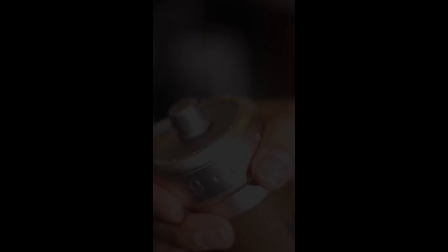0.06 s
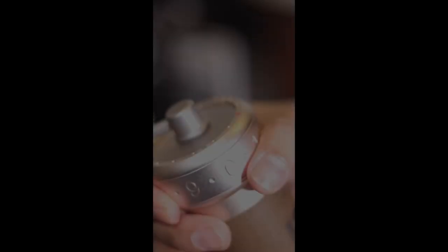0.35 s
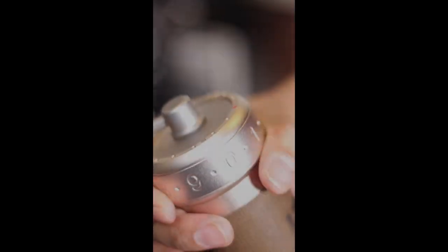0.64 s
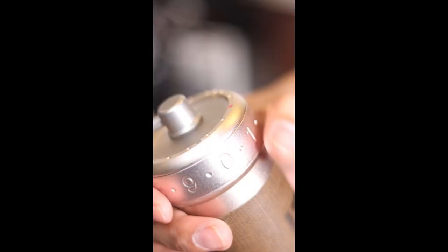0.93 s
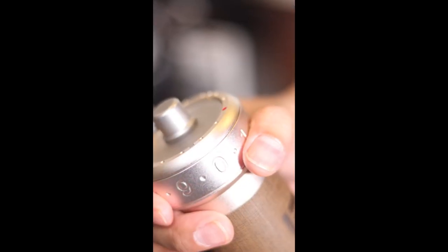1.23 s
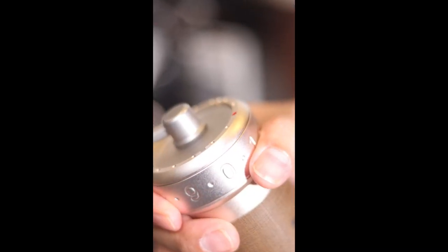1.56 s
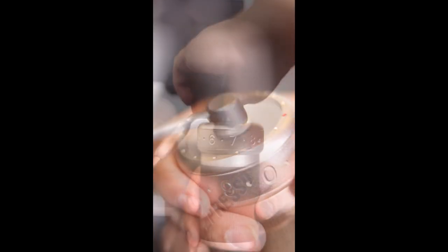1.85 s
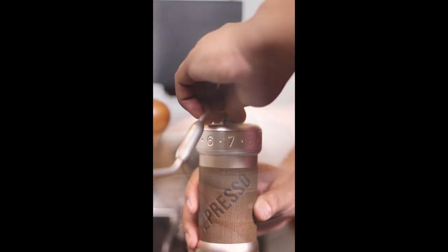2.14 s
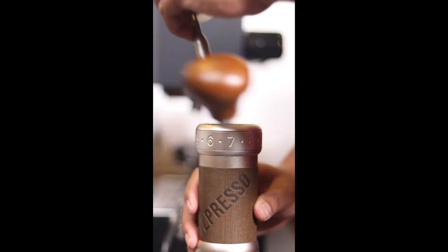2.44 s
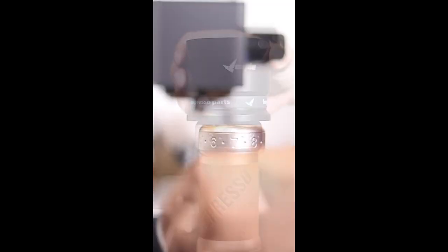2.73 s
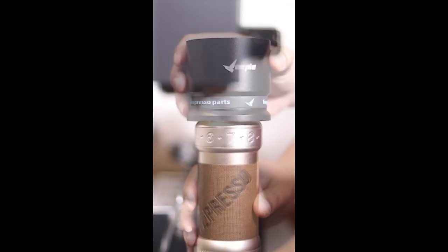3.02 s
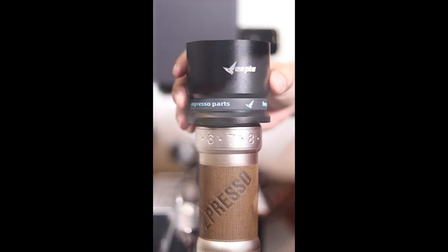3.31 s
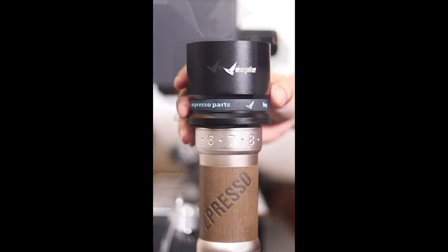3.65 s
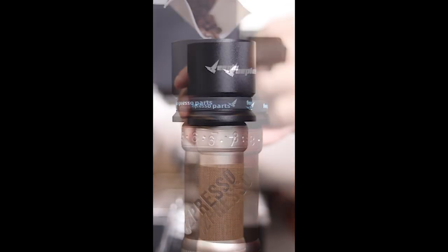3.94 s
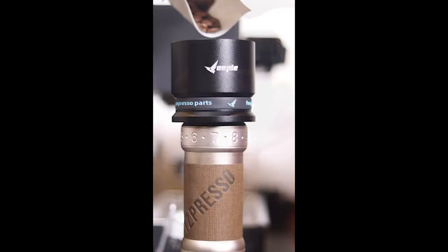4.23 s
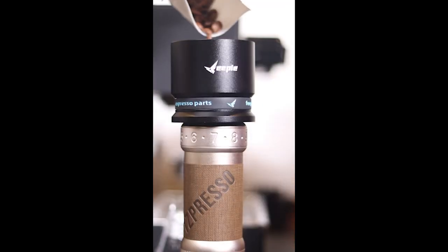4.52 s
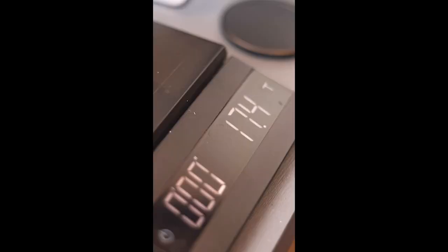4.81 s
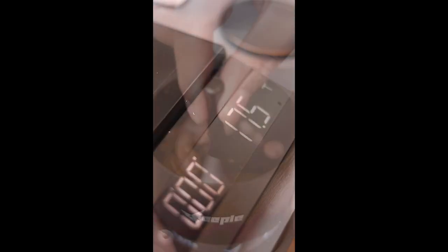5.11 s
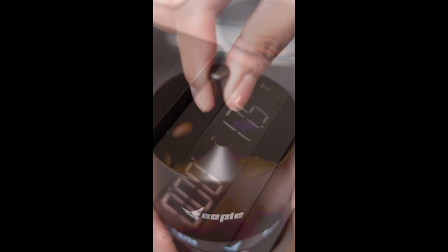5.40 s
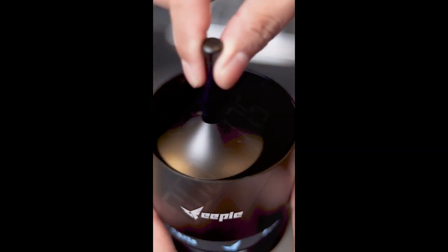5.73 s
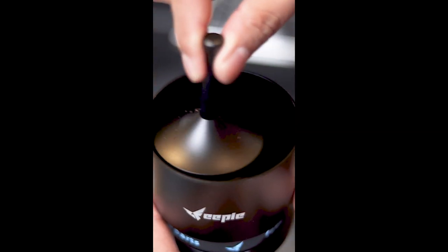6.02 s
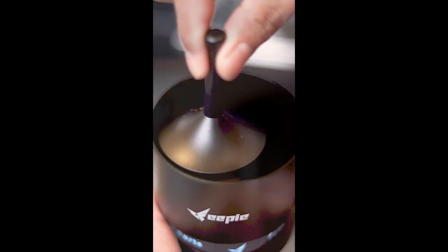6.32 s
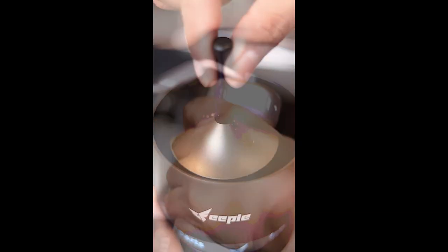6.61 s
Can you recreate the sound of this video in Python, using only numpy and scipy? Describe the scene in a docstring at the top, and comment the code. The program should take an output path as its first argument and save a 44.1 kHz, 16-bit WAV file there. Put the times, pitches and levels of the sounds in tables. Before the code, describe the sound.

A hand coffee grinder's dial gives a few sharp clicks. Its steel crank scrapes off briefly and a funnel knocks into place. Coffee beans trickle in, ticking and rattling, then rush more loudly into a metal cup. A plunger strikes the cup three times with loud, ringing clinks, and beans begin to crunch at the end. Everything is close in a small kitchen, with faint traffic outside.

```python
"""Making coffee with a metal hand grinder, close up in a small kitchen, with faint traffic outside.
First the grind dial clicks into its notches. The crank scrapes off (2.3 s), a funnel is knocked into
place (3.1 s) and beans pour in, ticking and rattling (3.6 s). More beans rush into a metal dosing cup
(4.9 s), which rings as its plunger strikes it. Last, the grinding burrs start to crunch beans (6.2 s)."""
import sys
import numpy as np
from scipy import signal
from scipy.fft import rfft, irfft
from scipy.io import wavfile

SR = 44100
rng = np.random.default_rng(int(sys.argv[2]) if len(sys.argv) > 2 else 0)


def put_to_file(sound):
    """Save the sound as 16-bit audio at rate SR, in the file named by the first command-line argument."""
    columns = np.atleast_2d(sound).T  # one column per channel
    safe = np.clip(columns, -1, 1)
    whole_steps = np.round(safe * 32767)
    wavfile.write(sys.argv[1], SR, whole_steps.astype(np.int16))


N = 302437
TIME = np.arange(N) / SR
RING_TIME, GRAIN_TIME = TIME[:SR // 2], TIME[:SR // 40]


def undb(db):
    """Turn decibels into a number to multiply by."""
    return 10 ** (np.asarray(db) / 20)


def unit(x):
    """Scale to an average power of 1."""
    return x / np.sqrt(np.mean(x ** 2))


def fade(t, t60):
    """Die away by 60 dB every t60 seconds."""
    return np.exp(-np.log(1000) * t / np.maximum(t60, 1e-4))


def note(hz, t60, t=RING_TIME):
    """One way an object can vibrate: a pure tone that dies away."""
    return np.sin(2 * np.pi * hz * t) * fade(t, t60)


def add(out, start_s, x):
    """Mix x into out from start_s on."""
    i = max(int(start_s * SR), 0)
    out[i:i + len(x)] += x[:max(N - i, 0)]


def colour(x, points, tilt_db=0, centre_hz=None, size=4096):
    """Shape the tone along (freq_hz, gain_db) points, with an optional tilt per octave or broad hump."""
    hz = np.maximum(np.arange(size // 2 + 1) * SR / size, 1)
    freqs, db = np.transpose(points)
    curve_db = np.interp(np.log(hz), np.log(freqs), db)
    shape = undb(curve_db + tilt_db * np.log2(np.maximum(hz, freqs[0])))
    shape = shape * np.minimum(hz / freqs[0], 1) * np.minimum(freqs[-1] / hz, 1) ** 2
    if centre_hz:
        shape = shape / np.hypot(1, (hz / centre_hz) ** 2) * np.sqrt(hz / (hz + centre_hz))
    # build the filter so that nothing sounds ahead of a hit
    cepstrum = irfft(np.log(unit(shape)))
    cepstrum[1:size // 2] *= 2
    cepstrum[size // 2 + 1:] = 0
    return signal.fftconvolve(x, irfft(np.exp(rfft(cepstrum))))[:len(x)]


def burst(t60):
    """Many vibrations dying at once: fading noise with a total energy of 1."""
    x = rng.standard_normal(len(RING_TIME)) * fade(RING_TIME, t60)
    return x / np.linalg.norm(x)


def snap(t60, hz, strength):
    """A dry crack with a hint of pitch, no higher than SR / 3."""
    crack = burst(t60)
    pitched = signal.lfilter(*signal.iirpeak(min(hz, SR / 3), 7, fs=SR), crack)
    x = crack + strength * pitched
    return x / np.linalg.norm(x)


def wander(rate_hz):
    """A smooth random drift, mostly between -1 and 1."""
    points = rng.standard_normal(1000)
    return np.interp(TIME * rate_hz, np.arange(len(points)), points)


def flow(start_s, build_s, stop_s, t60):
    """How strongly beans flow, 0 to 1: it builds up evenly, holds, then dies away."""
    return np.clip((TIME - start_s) / build_s, 0, 1) * fade(np.maximum(TIME - stop_s, 0), t60)


def grains(count, t60, crack, notes=6):
    """Tiny hits of equal energy: each bean has a few high notes of its own and a rough crack."""
    draw = rng.random((count, notes, 3))
    hz, phase = 2500 + 13000 * draw[..., :1], draw[..., 1:2]
    ring = np.sin(2 * np.pi * (hz * GRAIN_TIME + phase)).sum(axis=1) / np.sqrt(notes / 2)
    decay = fade(GRAIN_TIME, t60 * (.5 + draw[:, 0, 2:]))
    x = (ring + crack * rng.standard_normal(ring.shape)) * decay
    return x / np.linalg.norm(x, axis=1, keepdims=True)


def shower(stream, count, spread_db, t60, crack, thinning=0):
    """Random hits of uneven force; with thinning, fewer land where the flow is weak."""
    start, _, stop, dying_s = stream
    end = stop + dying_s / 2
    draw, out = rng.random((count, 3)), np.zeros(N)
    force = unit(undb(spread_db * np.minimum(-np.log(draw[:, 1]), 3)))
    times = start + (end - start) * (np.arange(count) + 4 * draw[:, 0] - 2) / count
    lands = draw[:, 2] < np.interp(times, TIME, flow(*stream)) ** thinning
    for start_s, strength, grain in zip(times, force * lands, grains(count, t60, crack)):
        add(out, start_s, strength * grain)
    return out * np.sqrt((end - start) * SR / count)


def kitchen(x, t60):
    """Echoes from nearby walls, duller than the direct sound."""
    echoes = burst(t60) * (1 - fade(RING_TIME, 0.0091))
    tail = colour(echoes, [(150, 0), (3500, -10), (5500, -10.5), (8000, -13.5), (15000, -19.0)])
    return signal.fftconvolve(x, tail)[:N]


def drone(start_s, length_s, first_hz, last_hz, db, waver_db):
    """A low, unsteady tone that swells and fades while its pitch slides."""
    along = np.clip((TIME - start_s) / length_s, 0, 1)
    pitch = (first_hz + (last_hz - first_hz) * along) * (1 + 0.0171 * wander(18))
    level = np.sin(np.pi * along) * undb(db + waver_db * wander(23))
    return level * np.sin(2 * np.pi * np.cumsum(pitch) / SR)


# how loud the background is over time: time_s, rumble_db, hiss_db
ROOM_LEVELS = [(0, -79.5, -87.5), (.2, -64.5, -71.5), (.8, -55.5, -69.5), (1.95, -53.5, -63.5),
               (2.25, -64, -68.5), (2.65, -63, -66), (3.5, -67.5, -69.5), (4.9, -58.5, -63),
               (6.86, -55.5, -59)]
# tone of the rumble and of the hiss: freq_hz, gain_db
RUMBLE_TONE = [(15, -32), (25, -6), (59, 0), (87, -1.5), (204, -1), (275, -12), (306, -8.5), (425, -20.5),
               (472, -14), (525, -21.5), (619, -21), (900, -31), (1170, -81), (1980, -120)]
HISS_TONE = [(300, 10.5), (700, 7), (1300, 0.5), (2200, -4), (3500, 0), (4600, -5.5), (6000, -14),
             (10000, -17.5), (16000, -19.5)]
# faint hums, like far engines: start_s, length_s, first_hz, last_hz, level_db
FAR_HUMS = [(0, 2.17, 197, 203.7, -56), (3.8, 1.27, 120.3, 99.1, -51.5), (3.92, 0.55, 162.2, 143.3, -57),
            (5.498, 1.03, 194.4, 196.2, -58.5), (5.697, 1.34, 165.7, 160, -58)]
def traffic():
    """Traffic rumbles through the walls under a soft hiss."""
    times, rumble_db, hiss_db = np.transpose(ROOM_LEVELS)
    rumble_level = undb(np.interp(TIME, times, rumble_db) + 1.7 * wander(9))
    rumble = rumble_level * colour(rng.standard_normal(N), RUMBLE_TONE)
    hiss = undb(np.interp(TIME, times, hiss_db)) * colour(rng.standard_normal(N), HISS_TONE)
    return rumble + hiss + sum(drone(*row, waver_db=3.0) for row in FAR_HUMS)


# tone of the crunch: freq_hz, gain_db
CRUNCH_TONE = [(150, -6.5), (550, -5), (1100, 2), (1550, 4), (2100, -0.5), (3200, 7), (4300, -1),
               (6200, -9), (7500, 1), (8500, -10), (10500, -14.5), (10950, -7.5), (11500, -9.5),
               (16000, -23)]
def burrs():
    """Beans crack in quick succession between the burrs, heard through the grinder's walls."""
    stream = (6.2, 0.58, 6.86, .1)  # start_s, build_s, stop_s, t60_s
    cracks = shower(stream, count=420, spread_db=3.5, t60=0.046, crack=3.3)
    return undb(-38.5) * flow(*stream) * colour(cracks, CRUNCH_TONE)


# scrapes of the crank: start_s, level_db, tilt_db_per_octave, t60_s
SCRAPES = [(2.251, -37.5, -2, 0.095), (2.286, -23, -4, 0.11), (2.2955, -21.5, 0, 0.069),
           (2.3015, -16.5, 2, 0.017), (2.445, -27.5, -3, 0.08), (2.451, -37, -5.5, 0.044)]
# their tone: freq_hz, gain_db
SCRAPE_TONE = [(300, -7.5), (550, -20), (900, -7), (1700, -4.5), (2300, 2.5), (3300, 6.5), (4200, -6.5),
               (5200, -12.5), (7500, -14), (12000, -26), (16000, -29)]
def crank():
    """The steel crank scrapes off its shaft."""
    out = np.zeros(N)
    for start_s, db, tilt_db, t60 in SCRAPES:
        add(out, start_s, undb(db) * colour(burst(t60), SCRAPE_TONE, tilt_db))
    return out


# knocks of the funnel: start_s, level_db, pitch_hz, t60_s
FUNNEL_KNOCKS = [(3.1008, -7.5, 960, 0.0058), (3.106, -16.5, 3040, 0.057), (3.1183, -16.5, 1510, 0.016),
                 (3.125, -22, 600, 0.052), (3.135, -27, 3000, 0.021)]
# their tone: freq_hz, gain_db
KNOCK_TONE = [(100, -9), (300, 1), (560, 7), (1000, 9.5), (1700, 5.5), (2300, -1), (3100, 8), (4500, -4.5),
              (8000, -17), (15000, -14)]
def funnel():
    """The funnel lands on the grinder and settles with a few softer knocks."""
    out = np.zeros(N)
    for start_s, db, hz, t60 in FUNNEL_KNOCKS:
        add(out, start_s, undb(db) * colour(burst(t60), KNOCK_TONE, centre_hz=hz))
    return out


# hollow notes of the grinder: start_s, pitch_hz, level_db, t60_s
BODY_NOTES = [(2.255, 607, -52, 0.28), (2.285, 530, -40.5, 0.041), (3.101, 169, -50.5, 0.29),
              (3.102, 277.4, -51.5, 0.4), (3.1, 553, -48, 0.15)]
def grinder_body():
    """The hollow body rings briefly when the crank or funnel bumps it."""
    out = np.zeros(N)
    for start_s, hz, db, t60 in BODY_NOTES:
        add(out, start_s, undb(db) * note(hz, t60))
    return out


# clicks of the dial: start_s, relative_level_db, pitch_hz, pitch_strength, echo_db
DIAL_CLICKS = [(0.128, -20, 14200, 0.37, -10.5), (0.3369, -13, 2920, 1, -11), (.709, -43, 6100, 1.7, -4),
               (1.106, -46, 2200, 3.2, -3), (1.6256, -11.5, 10100, 2.6, -19), (1.6262, -14, 5130, 4.4, -15)]
# their tone: freq_hz, gain_db
CLICK_TONE = [(300, -19.5), (1200, -8), (2000, -4.5), (2800, 1.5), (3800, -1.5), (5300, 2), (7000, -4.5),
              (8700, -7), (10500, 1.5), (12200, -7.5), (14000, 1.5), (16000, -5.5)]
def dial():
    """A catch snaps into its notch and the thick steel rings for a few milliseconds."""
    direct, to_walls = np.zeros(N), np.zeros(N)
    for start_s, db, hz, strength, echo_db in DIAL_CLICKS:
        click = undb(db + 1.5) * colour(snap(t60=0.016, hz=hz, strength=strength), CLICK_TONE)
        add(direct, start_s, click)
        add(to_walls, start_s, click * undb(echo_db))
    return direct + kitchen(to_walls, t60=0.18)


# the hardest landings: start_s, relative_level_db, pitch_hz
LANDINGS = [(3.717, -39.5, 12000), (3.751, -35, 13800), (3.789, -39.5, 4900), (3.8494, -33, 7800),
            (3.9273, -38.5, 7190), (3.9695, -29, 11400), (3.986, -27, 13000), (4.0883, -30, 8000),
            (4.1522, -21.5, 11500), (4.2357, -26.5, 12000), (4.2628, -27.5, 10900), (4.3061, -29, 8000),
            (4.3797, -24, 6930), (4.4001, -24.5, 11900), (4.522, -25, 13600), (4.5845, -36, 11200),
            (4.717, -34, 4820), (4.7503, -28, 10200), (4.8604, -29.5, 4620), (5.4036, -19.5, 12900),
            (5.4148, -20, 10100), (5.4343, -25, 9600), (5.468, -23, 15000), (5.61, -21.5, 5160),
            (5.65, -26, 8400), (5.7157, -21.5, 8600), (5.7812, -32, 5100), (5.8239, -32.5, 4830),
            (5.8553, -36, 8700)]
# their tone: freq_hz, gain_db
LANDING_TONE = [(400, -21), (1500, -7), (3500, -1.5), (5300, -4), (7000, -8.5), (8400, -3), (9300, -7),
                (11500, -2.5), (14000, -5), (16000, -19)]
def hard_beans():
    """A few beans land hard, each with a pitch of its own."""
    out = np.zeros(N)
    for start_s, db, hz in LANDINGS:
        add(out, start_s, undb(db + 12.0) * snap(t60=0.0144, hz=hz, strength=2.8))
    return colour(out, LANDING_TONE)


# tone of the ticking beans and of the shaken funnel: freq_hz, gain_db
FUNNEL_TICK_TONE = [(1500, -22), (4000, 0.5), (5400, 5.5), (7000, -1), (8300, 3), (9300, -2), (11000, 3),
                    (14000, -3.5), (16000, -14)]
FUNNEL_RATTLE_TONE = [(150, -2.5), (300, -2), (470, -2.5), (650, -6), (1000, 0), (1650, 2.5), (2300, -2.5),
                      (3600, 1.5), (5000, -16), (7000, -13), (12000, -23)]
def beans_in_funnel(clumps):
    """Beans tick against each other and rattle the funnel."""
    stream = (3.62, .42, 4.868, .03)  # start_s, build_s, stop_s, t60_s
    pour = flow(*stream)
    bean_hits = shower(stream, count=380, spread_db=5.0, t60=0.031, crack=1.0, thinning=.7)
    wall_hits = shower(stream, count=300, spread_db=1.5, t60=0.069, crack=11.5)
    ticks = undb(-49) * pour ** 1.03 * colour(bean_hits, FUNNEL_TICK_TONE, tilt_db=2.0)
    rattle = undb(-49.5) * pour * colour(wall_hits, FUNNEL_RATTLE_TONE)
    return clumps * ticks + rattle


# short notes of the cup's wall: pitch_hz, t60_s, relative_level_db
WALL_NOTES = [(3156, 0.35, -14), (3320, 0.1257, -24), (3430, .12, -18), (5090, 0.13, -15),
              (8600, .3, -17.5), (11326, .2, -20)]
def cup_wall(rattle):
    """Beans striking the cup stir short metallic notes in its wall."""
    ring = sum(undb(db) * unit(note(hz, t60)) for hz, t60, db in WALL_NOTES)
    return signal.fftconvolve(rattle, ring / np.sqrt(len(RING_TIME)))[:N]


# tone of the ticking beans and of the shaken cup: freq_hz, gain_db
CUP_TICK_TONE = [(1500, -18), (4000, -0.5), (5200, 4), (7000, -4), (9000, 4), (11500, 7.5), (13500, 4.5),
                 (16000, -5)]
CUP_RATTLE_TONE = [(300, -11), (900, -11.5), (1350, 4), (1600, -1), (1850, -6.5), (2200, 4), (2700, -1),
                   (3300, 3.5), (4100, 4), (5000, 3.5), (7000, 3.5), (12000, 2)]
def beans_in_cup(clumps):
    """Beans tick against each other and rattle the metal cup, which rings in answer."""
    stream = (4.925, 0.38, 5.46, .85)  # start_s, build_s, stop_s, t60_s
    pour = flow(*stream)
    bean_hits = shower(stream, count=260, spread_db=3.0, t60=0.0091, crack=0.6, thinning=.35)
    wall_hits = shower(stream, count=220, spread_db=0.5, t60=0.055, crack=2.8)
    ticks = undb(-37.5) * pour ** 0.83 * colour(bean_hits, CUP_TICK_TONE, tilt_db=2.8)
    rattle = undb(-37.5) * pour * colour(wall_hits, CUP_RATTLE_TONE)
    return clumps * ticks + rattle + undb(-13.5) * cup_shimmer(rattle) + cup_wall(rattle)


# clumps of beans sliding in at once: middle_s, half_length_s, boost_db
BEAN_CLUMPS = [(4.16, .035, 2), (4.396, .02, 4), (4.629, 0.036, 7.5), (5.424, 0.021, 7), (5.55, 0.033, 5.5)]
def beans():
    """Both pours and their echo; the ticking swells as each clump slides in."""
    clumps = undb(sum(db * np.exp(-((TIME - s) / half_s) ** 2) for s, half_s, db in BEAN_CLUMPS))
    out = beans_in_funnel(clumps) + beans_in_cup(clumps) + hard_beans()
    return out + undb(-9.5) * kitchen(out, t60=0.059)


# the cup's six notes, the lowest two so close that they throb: pitch_hz, t60_s
CUP_NOTES = [(1588, 0.65), (1604, 0.3), (3137, 0.81), (4904, .38), (7219, 0.32), (10130, 0.14)]
def cup_shimmer(rattle):
    """The rattle keeps three of the cup's lower notes faintly ringing."""
    ring = sum(note(hz, .5 * t60) for hz, t60 in CUP_NOTES[1:4])
    return signal.fftconvolve(rattle, ring / np.linalg.norm(ring))[:N]


# plunger blows; the spot struck sets how loud each of the cup's notes is:
# start_s, clack_db, clack_tilt_db_per_octave, relative_knock_db, then six of relative_note_db
BLOWS = [(4.952, -27, -4, -41, -56, -56, -53, -68, -72, -71),
         (5.257, 1.5, -1, -14, -45, -23.5, -16.5, -32.5, -46, -31.5),
         (6.122, 2.5, 2.5, -5, -29, -38, -28.5, -17.5, -26.5, -28.5),
         (6.2747, 3.5, 1, -10.5, -31.5, -56, -27, -18, -33, -39.5)]
# tone of the clack and of the plunger's dull knock: freq_hz, gain_db
CLACK_TONE = [(200, -27), (450, 0.5), (750, 5.5), (1200, -0.5), (2000, 11.5), (3000, 18), (4400, 9.5),
              (5200, 12), (6600, 6), (7300, 9), (8500, -6), (12000, -9), (14000, 4.5), (16000, -34)]
PLUNGER_TONE = [(200, -16), (380, -18.5), (480, 3), (620, -14), (800, -12), (1200, -13.5)]
def struck_cup():
    """Each blow gives a short clack and a dull knock, then the cup's clean notes ring on."""
    rings, clacks, t = np.zeros(N), np.zeros(N), TIME[:SR]
    knock_lag_s, grip_s = 0.00599, .13
    # the ring builds up, drops quickly at first, then is muffled by the hand
    attack = (1 - fade(t, 0.017)) * (1 + 0.49 * fade(t, 0.13))
    grip = fade(np.maximum(t - grip_s, 0), t60=1)
    for start_s, clack_db, tilt_db, knock_db, *notes_db in BLOWS:
        add(clacks, start_s, undb(clack_db) * colour(burst(t60=0.023), CLACK_TONE, tilt_db))
        knock = undb(knock_db - 2.5) * colour(burst(t60=0.053), PLUNGER_TONE)
        add(clacks, start_s + knock_lag_s, knock)
        for (hz, t60), db in zip(CUP_NOTES, notes_db):
            add(rings, start_s, undb(db) * note(hz, t60, t) * attack * grip)
    echoes = undb(-13.5) * kitchen(clacks, t60=0.25) + undb(-26) * kitchen(rings, t60=0.25)
    return rings + clacks + echoes


def scene():
    """All the sounds together, close up, in one channel."""
    clicks = dial()
    handling = crank() + funnel() + grinder_body()
    handling += undb(-11.0) * kitchen(handling, t60=0.28)
    crank_wobble = drone(start_s=2.28, length_s=.19, first_hz=66, last_hz=52, db=-49, waver_db=2.5)
    return (clicks + handling + crank_wobble + struck_cup() + beans() + burrs() + traffic())[None]


def record(dry):
    """Cut away the very highest treble."""
    top_hz = 16600
    return signal.sosfilt(signal.ellip(10, .2, 70, top_hz, fs=SR, output="sos"), dry)


dry = scene()
out = record(dry)
put_to_file(out)
```